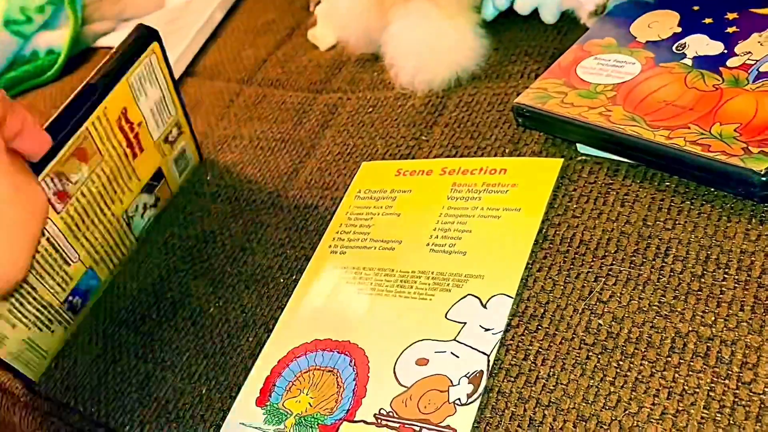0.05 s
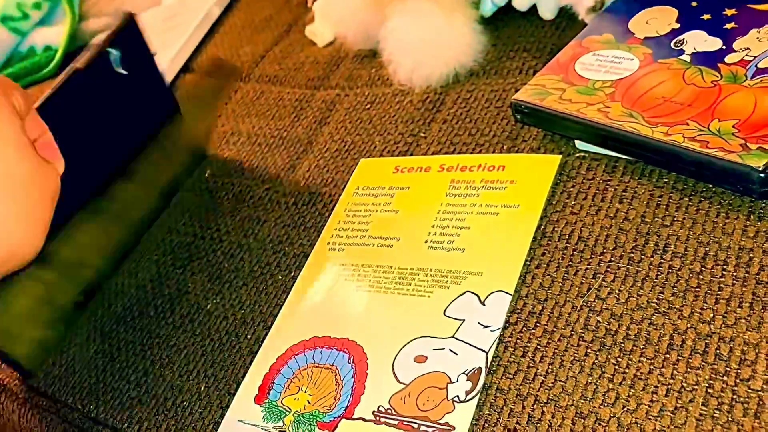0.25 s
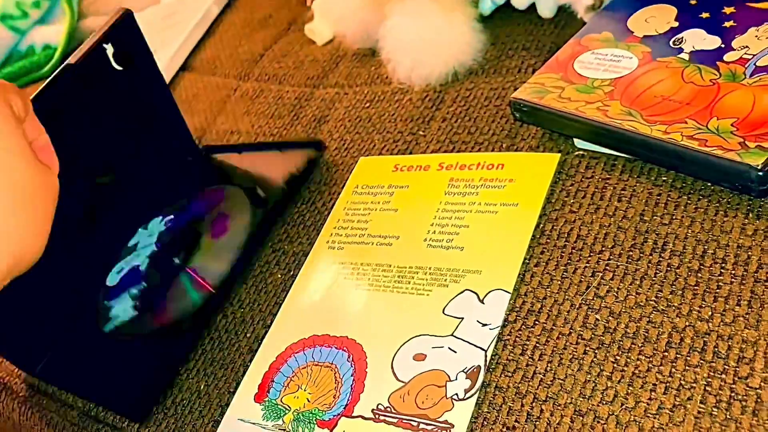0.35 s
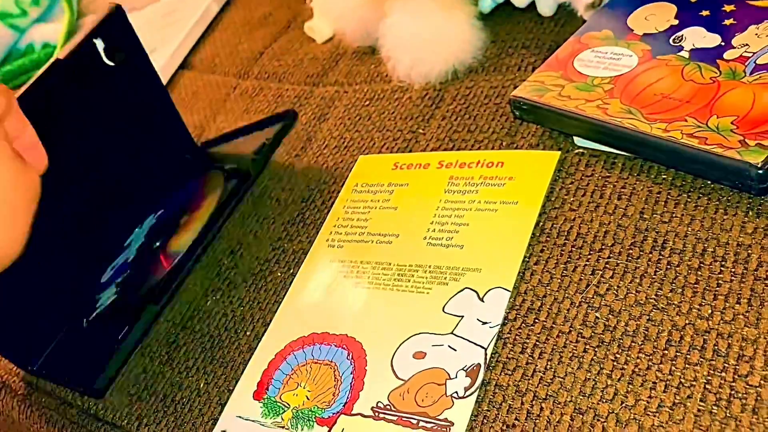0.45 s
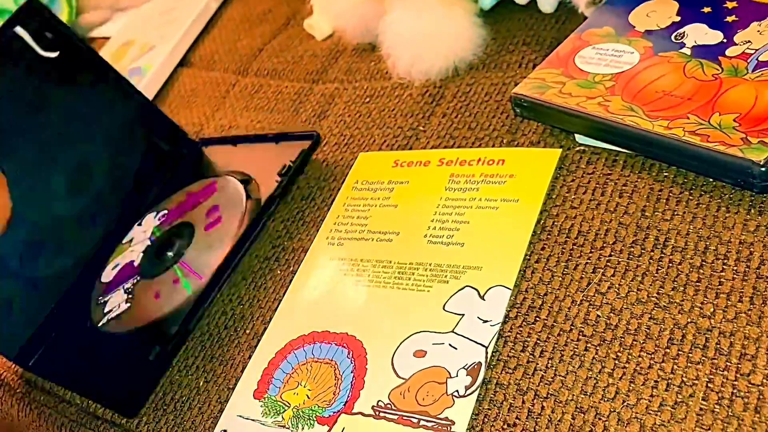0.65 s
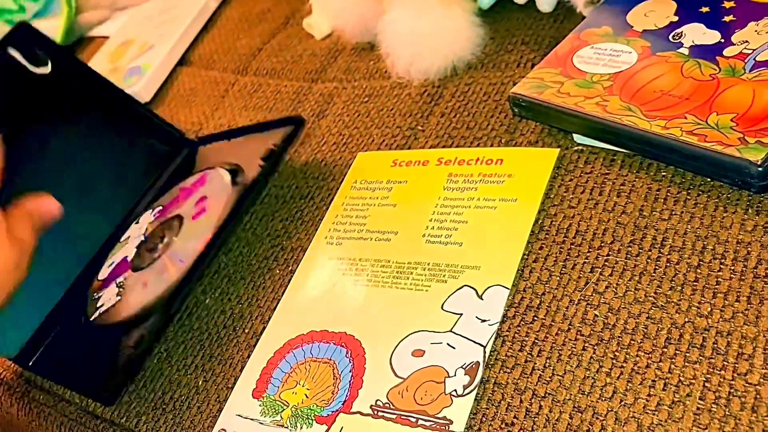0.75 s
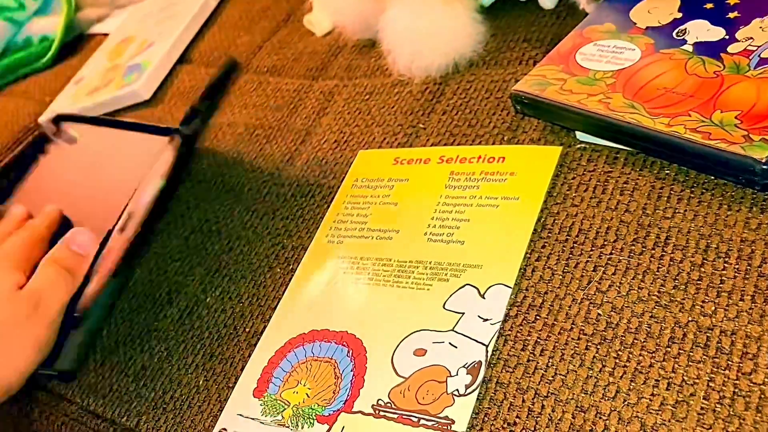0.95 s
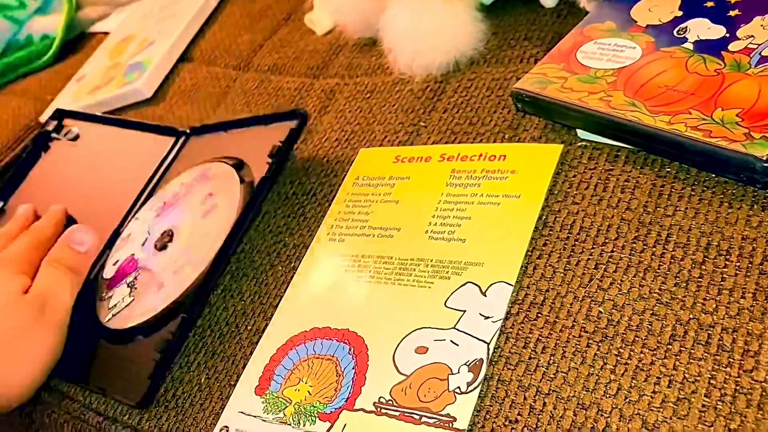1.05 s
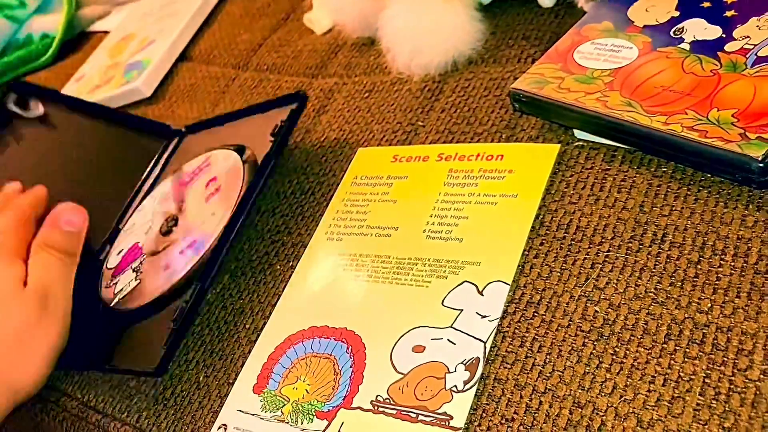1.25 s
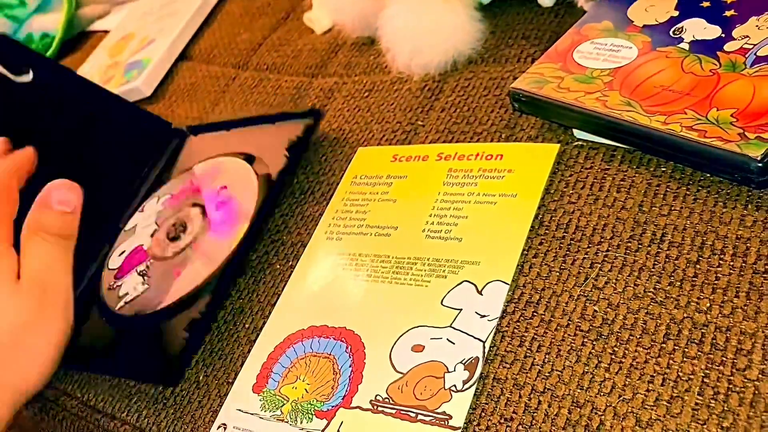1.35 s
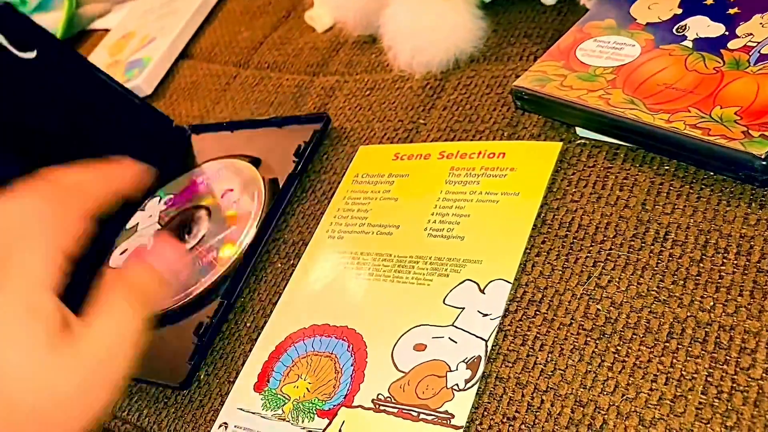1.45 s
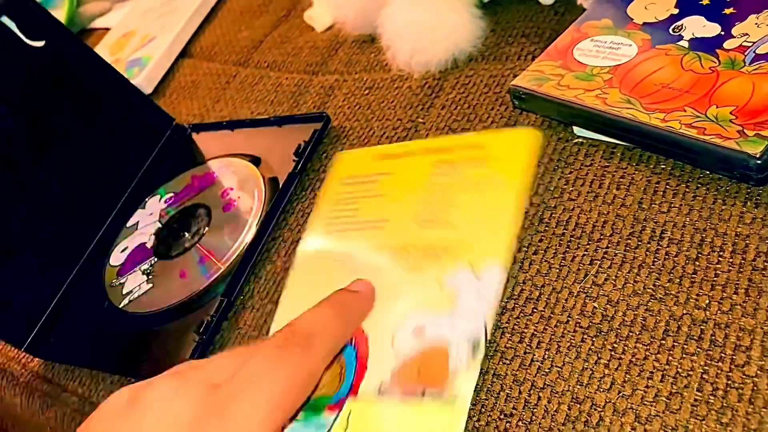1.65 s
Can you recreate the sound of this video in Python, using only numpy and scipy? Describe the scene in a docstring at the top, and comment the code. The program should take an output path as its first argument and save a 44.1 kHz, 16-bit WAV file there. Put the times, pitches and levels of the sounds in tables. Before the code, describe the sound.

A hard plastic disc case pops open by hand, two catches snapping almost as one, with a brief rattle, then tiny ticks, finger slides and soft cushion bumps; close microphone in a small quiet room.

```python
"""Opening a plastic disc case

A case is opened by hand on a sofa, close to the camera: two catches snap in quick succession, then small ticks.
Snaps and ticks are noise cracks plus ringing shell tones; a flexing knock is one tone gliding down.
The disc's buzz, creaks, sliding fingers and dragging are coloured noise; cushion thuds are low fading tones.
A small room answers with a short noise tail, over faint air noise and mains hum.
"""
import sys
import numpy as np
from scipy import signal
from scipy.fft import rfft, irfft, next_fast_len
from scipy.io import wavfile
from scipy.ndimage import uniform_filter1d, map_coordinates

SR = 44100
rng = np.random.default_rng(int(sys.argv[2]) if len(sys.argv) > 2 else 0)


def master(y):
    """Save y as 16-bit WAV."""
    cut = np.clip(np.atleast_2d(y).T, -1, 1)
    pcm = np.round(cut * 32767)  # scale
    wavfile.write(sys.argv[1], SR, pcm.astype(np.int16))


N = 74970  # length in samples

# Levels of snaps, ticks and rubbing sounds are before the direct and room gains in scene().
# the catches letting go: start_s, ring_db, ring_centre_hz, crack_db
CATCH_SNAPS = [(.23416, -16, 2600, -12.5), (.24404, -8.8, 1000, -10.5)]
# small ticks and knocks of the case: start_s, ring_db, ring_centre_hz, crack_db
CASE_TICKS = [(.267, -48, 1480, -27.5), (.283, -39.5, 1210, -33), (.3435, -44.5, 1440, -40.5),
              (.465, -56, 1730, -54.5), (.492, -60.5, 2000, -54), (.5188, -53, 1550, -46.5),
              (.564, -51, 875, -52), (.596, -43, 1480, -55), (.6172, -57, 1482, -47),
              (.6395, -50, 1268, -48.5), (.9985, -48, 1490, -62), (1.066, -58.5, 1700, -54.5),
              (1.107, -47, 3120, -44.5), (1.6415, -41, 720, -38.5), (1.669, -46, 2010, -41.5),
              (1.6792, -29.5, 1168, -60)]
# ringing tones of the closed shell: pitch_hz, relative_level_db, time_to_fall_60_db_s
SHELL_MODES = [(468, 3, .025), (820, -8, .035), (990, -1, .024), (1060, 3, .024), (1330, -9, .025),
               (1570, -6, .028), (1730, -10, .025), (2070, 0, .019), (2230, -8, .016), (2800, -4, .008),
               (3150, -1, .008), (3580, -6, .01)]
# the shell slackens and rings lower once it is open: time_s, pitch_ratio
SHELL_SLACK = [(.26, 1), (.6, .925)]
BEND_S, RING_ATTACK_S = .00053, .00096  # arrival delay and rise time of a 1 kHz shell tone
# colour of the sharp crack: frequency_hz, relative_level_db
CRACK_COLOUR = [(300, 4.5), (1500, 2), (3000, 10.5), (4600, -12), (6200, 1), (8300, -0.5), (10000, -10),
                (12000, -9), (16000, -21.5)]

# the half-open case drops back and flexes: start_s, level_db
FLEX_KNOCK = (.6175, -35)
# first pitch; time for the pitch to halve; time to fall 60 dB
FLEX_START_HZ, FLEX_FALL_S, FLEX_T60_S = 3180, .00058, 0.067

# colour of the disc buzzing in its tray: frequency_hz, relative_level_db
RATTLE_TINT = [(200, -16.5), (900, 4.5), (2200, -14), (4200, -4.5), (8000, -10), (16000, -22.5)]
RATTLE_DB, RATTLE_T60_S = -35, 0.13
# the cover straining and creaking under the fingers: time_s, level_db
RUB_LEVEL = [(0, -55), (.205, -58), (.228, -46), (.26, -47), (.38, -73.5), (.55, -89), (.595, -51.5),
             (.64, -63), (.67, -78.5), (1.62, -83.5), (1.655, -56), (1.7, -48.5)]
# colour of the creaking: frequency_hz, relative_level_db
RUB_TINT = [(120, -11.5), (470, -0.5), (620, -10), (1020, -8.5), (1410, 2), (2480, -7), (3300, -16),
            (4800, -30), (6150, -17.5), (8200, -30), (16000, -60)]
# fingertips sliding on smooth plastic: time_s, level_db
SLIDE_LEVEL = [(.43, -103), (.54, -79), (.59, -56), (.645, -58.5), (.69, -92), (.73, -75.5), (.81, -52),
               (.87, -59.5), (.95, -65.5), (1.03, -85.5), (1.09, -67), (1.19, -76), (1.255, -70),
               (1.33, -99), (1.6, -102), (1.62, -72), (1.67, -48.5), (1.7, -49.5)]
# colour of the sliding: frequency_hz, relative_level_db
SLIDE_TINT = [(500, 3), (3600, -15), (5200, -13.5), (6500, 1), (8200, 1.5), (10000, -6), (11500, -3),
              (15000, -15.5), (16200, -24.5)]
# the case dragging over the upholstery: time_s, level_db
DRAG_LEVEL = [(.7, -70), (.79, -61.5), (1.02, -55.5), (1.28, -60), (1.42, -71), (1.6, -78)]
# colour of the dragging: frequency_hz, relative_level_db
DRAG_TINT = [(120, -7.5), (280, -4), (500, 5), (850, -4.5), (1300, 0), (2100, -4), (3000, -22), (6000, -33),
             (11000, -44.5), (16000, -60)]

# pushes into the cushion: start_s, level_db, hardness_db_per_octave
CUSHION_PUSHES = [(0.257, -44.5, 11.5), (.285, -32.5, -3), (.351, -38, -5.5), (0.635, -40.5, -0.5),
                  (0.991, -49, -4), (1.057, -35.5, -30), (1.605, -42.5, 0.5), (1.641, -34.5, 2)]
# tones of the cushion: pitch_hz, relative_level_db, time_to_fall_60_db_s
CUSHION_MODES = [(66.8, 2.5, 0.21), (128, 0.5, 0.1), (205.7, -1, 0.034)]

# loudness of the left side over the right: frequency_hz, left_minus_right_db
LEFT_RIGHT_BALANCE = [(200, 2.5), (500, 1.5), (1100, -2.5), (2200, -8), (4500, 4.5), (12000, -1.5)]
# the right port hears the case late, mostly in the treble (extra lag above the knee)
PORT_LAG_S, PORT_KNEE_HZ, BASS_LAG_S = 0.0002357, 2070, .00007
# how alike sound from all around is at the two ports: frequency_hz, likeness_0_to_1
PORT_LIKENESS = [(60, 0.92), (450, 0.46), (1500, 0.077), (4000, 0.13)]
# how long the room tail lasts: frequency_hz, time_to_fall_60_db_s
ROOM_DECAY = [(100, 0.22), (500, 0.59), (1500, 0.3), (4000, 0.15), (9000, 0.037), (16000, 0.03)]
# colour of the room's answer: frequency_hz, gain_db
ROOM_TINT = [(100, -1), (450, -23), (1000, -25.5), (3000, -13.5), (8000, -8), (16000, -14.5)]
ROOM_GAP_S = 0.0011  # before the nearest surfaces answer

# colour of the faint room air: frequency_hz, relative_level_db
AIR_COLOUR = [(20, -26.5), (40, -8), (62, 15), (95, 10.5), (170, -2.5), (450, 1.5), (950, -17),
              (1350, -5.5), (1650, -22.5), (2100, -21.5), (2800, -33), (8000, -35), (16000, -48.5)]
AIR_DB = -60.5
# mains hum: pitch_hz, level_db
MAINS_HUM = [(60, -52.5), (120, -71.5)]
LOW_CUT_HZ, TOP_HZ = 49, 16500  # 6 dB down at the low cut; silent from the top


def amp(db):
    """Turn decibels into gain."""
    return 10 ** (np.asarray(db) / 20)


def unit(x):
    """Scale to an rms (average strength) of 1."""
    return x / np.sqrt(np.mean(x ** 2) + 1e-20)


def along(points, hz):
    """Read a curve of (Hz, value) points on a log frequency axis."""
    point_hz, value = np.transpose(points)
    return np.interp(np.log(hz + 1), np.log(point_hz + 1), value)


def level(rows):
    """Turn (s, dB) points into a gain for every sample."""
    return amp(np.interp(np.arange(N) / SR, *np.transpose(rows)))


def wobble(rate):
    """A smooth random curve with this many random points a second."""
    knots = rng.standard_normal(int(N * rate / SR) + 4)
    return map_coordinates(knots, [np.arange(N) * rate / SR])


def filtered(x, response):
    """Change the strength and timing of each frequency in x."""
    m = next_fast_len(N + SR // 2)
    spectrum = rfft(x, m) * response(np.fft.rfftfreq(m, 1 / SR))
    return irfft(spectrum, m)[..., :N]


def coloured(x, colour):
    """Give x a (Hz, dB) colour, at rms 1."""
    return unit(filtered(x, lambda hz: amp(along(colour, hz))))


def since(s):
    """Time after s, zero before it."""
    return np.maximum(np.arange(N) / SR - s, 0)


def strike(t, attack_s, t60):
    """A quick rise and an exponential decay."""
    return (1 - np.exp(-t / attack_s)) * amp(-60 * np.minimum(t / t60, 10))


def blows(rows, scatter_db, focus_db, crack_attack_s, crack_t60):
    """Each blow cracks and rings the shell; its low bending waves arrive last."""
    ring, burst = np.zeros(N), np.zeros(N)
    grit = coloured(rng.standard_normal(N), CRACK_COLOUR)
    for s, ring_db, centre_hz, crack_db in rows:
        slack = np.interp(s, *np.transpose(SHELL_SLACK))
        for (hz, db, t60), luck in zip(SHELL_MODES, rng.standard_normal(len(SHELL_MODES))):
            khz = hz / 1000
            t = since(s + BEND_S / np.sqrt(khz))
            # focus_db less at one octave from the centre
            off_centre_db = focus_db * np.log2(hz / centre_hz) ** 2
            gain = amp(ring_db + db - off_centre_db + scatter_db * luck)
            tone = np.sin(2 * np.pi * slack * hz * t)
            ring += gain * strike(t, RING_ATTACK_S / khz, t60) * tone
        burst += amp(crack_db) * strike(since(s), crack_attack_s, crack_t60)
    return ring + burst * grit


def catch_snaps():
    """Each catch lets go with a crack and a ring of the shell."""
    return blows(CATCH_SNAPS, scatter_db=.3, focus_db=.6, crack_attack_s=.0006, crack_t60=.018)


def case_ticks():
    """Small ticks and knocks, with a more varied ring and a shorter crack."""
    return blows(CASE_TICKS, scatter_db=5, focus_db=1.5, crack_attack_s=0.00011, crack_t60=0.014)


def flex(attack_s):
    """A knock that glides down: short bending waves cross the panel first, long ones follow."""
    s, db = FLEX_KNOCK
    t = since(s)
    cycles = FLEX_START_HZ * FLEX_FALL_S * np.log1p(t / FLEX_FALL_S)
    return amp(db) * strike(t, attack_s, FLEX_T60_S) * np.sin(2 * np.pi * cycles)


def friction(colour, grain_db, uneven_db):
    """Dense tiny contacts of uneven size, at rms 1."""
    size_db = grain_db * wobble(1500) + uneven_db * wobble(70)
    return coloured(rng.standard_normal(N) * amp(size_db), colour)


def patchy(x, depth_db):
    """The colour of a sliding contact keeps shifting as it moves."""
    z = signal.stft(x, nperseg=256)[2]
    # random values smoothed over frequency, then over time
    field = uniform_filter1d(rng.standard_normal(z.shape), size=4, axis=0)
    field = uniform_filter1d(field, size=12, axis=1)
    return unit(signal.istft(z * amp(depth_db * unit(field)), nperseg=256)[1][:N])


def disc_rattle():
    """The disc buzzes in its tray after the last catch and dies away."""
    fade = strike(since(CATCH_SNAPS[-1][0]), 0.012, RATTLE_T60_S)
    return amp(RATTLE_DB) * fade * friction(RATTLE_TINT, grain_db=0.0, uneven_db=1)


def cover_rub():
    """The cover strains and creaks as tiny slips under the fingers."""
    return level(RUB_LEVEL) * friction(RUB_TINT, grain_db=1.5, uneven_db=1)


def finger_slide():
    """Fingertips slide on plastic: uneven tiny contacts with a shifting colour."""
    contacts = friction(SLIDE_TINT, grain_db=2.5, uneven_db=1.5)
    return level(SLIDE_LEVEL) * patchy(contacts, depth_db=2.2)


def case_drag():
    """The case drags over the upholstery in many small slips."""
    return level(DRAG_LEVEL) * friction(DRAG_TINT, grain_db=2.5, uneven_db=0.7)


def thuds(attack_cycles):
    """The case bumps the cushion, which answers low and soft; harder pushes reach its upper tones."""
    total = np.zeros(N)
    for s, push_db, hard_db in CUSHION_PUSHES:
        t = since(s)
        for hz, db, t60 in CUSHION_MODES:
            octaves_up = np.log2(hz / CUSHION_MODES[0][0])
            gain = amp(push_db + db + hard_db * octaves_up)
            total += gain * strike(t, attack_cycles / hz, t60) * np.sin(2 * np.pi * hz * t)
    return total


def ports(x):
    """Direct sound reaches two microphone ports with different strength and timing."""
    half = np.array([[.5], [-.5]])  # left, right

    def response(hz):
        lag_cycles = BASS_LAG_S * hz + PORT_LAG_S * np.maximum(hz - PORT_KNEE_HZ, 0)
        gain = amp(half * along(LEFT_RIGHT_BALANCE, hz))
        return gain * np.exp(1j * half * 2 * np.pi * lag_cycles)

    return filtered(x, response)


def diffuse(pair):
    """Two unrelated signals become sound from all around: most alike in the bass."""
    def mix(hz):
        turn = np.arccos(np.clip(along(PORT_LIKENESS, hz), -1, 1)) / 2
        return np.array([np.cos(turn), np.sin(turn)])

    mid, side = filtered(pair, mix)
    return np.array([mid + side, mid - side])


def room(x):
    """A short diffuse tail; each frequency dies at its own speed."""
    hz, t, z = signal.stft(rng.standard_normal((2, SR // 2)), SR, nperseg=256)
    fade = strike(np.maximum(t - ROOM_GAP_S, 0), 0.00053, along(ROOM_DECAY, hz)[:, None])
    tail = signal.istft(z * fade, SR, nperseg=256)[1]
    wet = signal.fftconvolve(x[None], tail / np.linalg.norm(tail[0]), axes=1)[:, :N]
    return diffuse(filtered(wet, lambda hz: amp(along(ROOM_TINT, hz))))


def background():
    """Faint room air as steady noise, with mains hum as steady tones."""
    air = diffuse(coloured(rng.standard_normal((2, N)), AIR_COLOUR))
    hum = np.zeros(N)
    for hz, db in MAINS_HUM:
        hum += amp(db) * np.sin(2 * np.pi * (hz * since(0) + rng.random()))
    return amp(AIR_DB) * air + hum


def scene():
    """The case and the hands, heard directly and through the room."""
    snaps, ticks = catch_snaps(), case_ticks()
    rattle, rub = disc_rattle(), cover_rub()
    slide, drag = finger_slide(), case_drag()
    knock = flex(attack_s=0.00073)
    direct = ports(snaps + ticks + knock + rattle + rub + slide + amp(-4.0) * drag)
    # each source excites the room by its own amount
    to_room = amp(-3.5) * snaps + amp(2.5) * ticks + amp(8.0) * rattle
    to_room += amp(8.0) * rub + amp(11.0) * drag + amp(-3.5) * slide
    return direct + room(to_room) + thuds(attack_cycles=0.83) + background()


def record(dry):
    """The camera sheds deep bass and keeps nothing above its band limit."""
    def response(hz):
        low_cut = (1j * hz / (LOW_CUT_HZ + 1j * hz)) ** 2
        return low_cut * (hz < TOP_HZ)

    return filtered(dry, response)


dry = scene()
out = record(dry)
master(out)
```